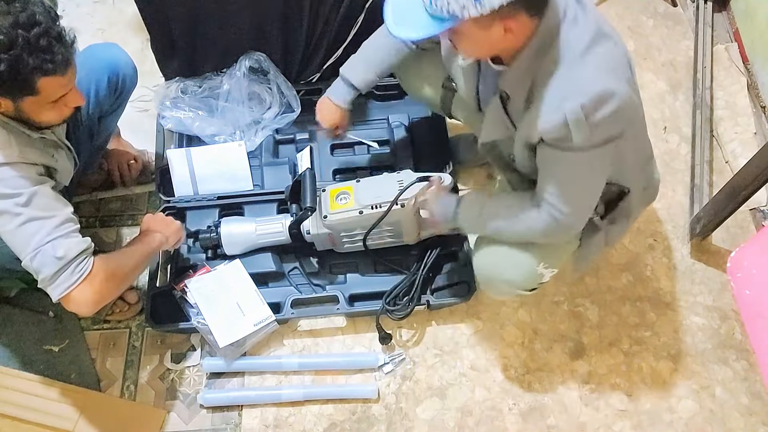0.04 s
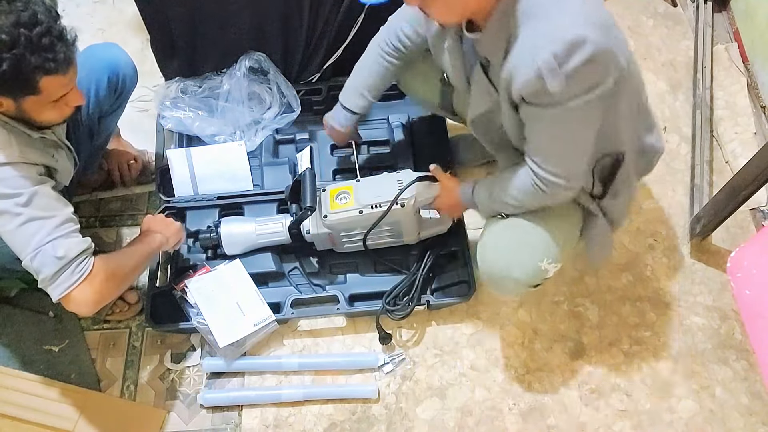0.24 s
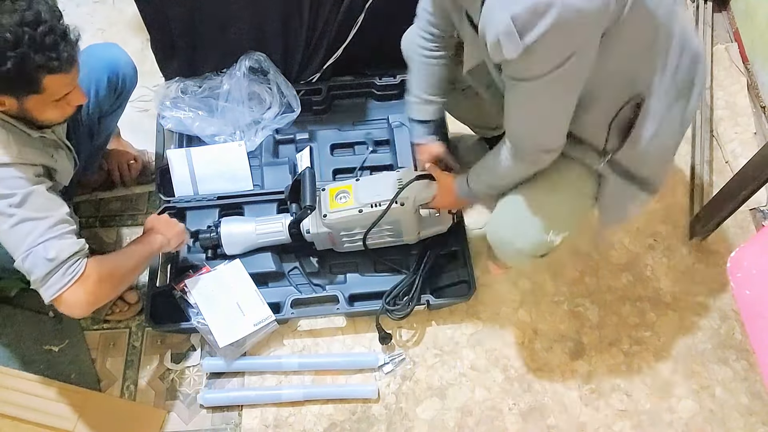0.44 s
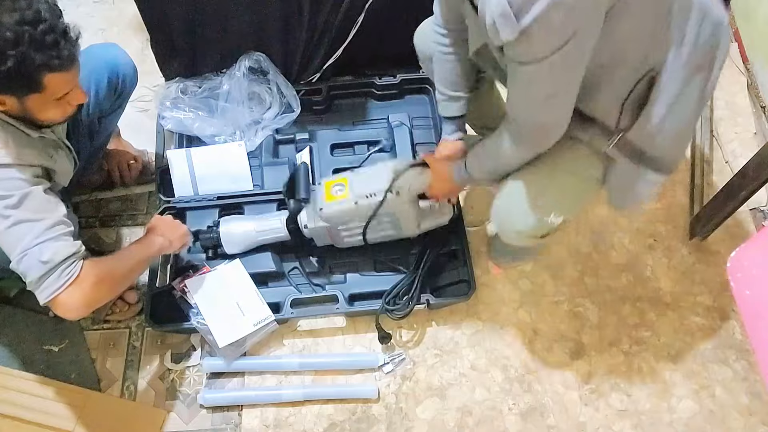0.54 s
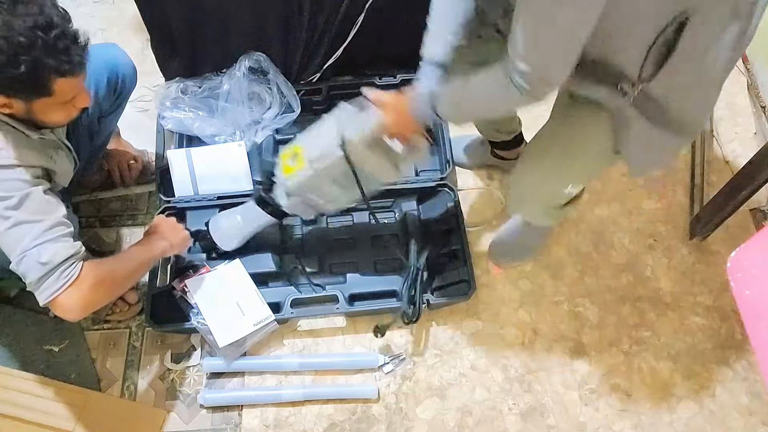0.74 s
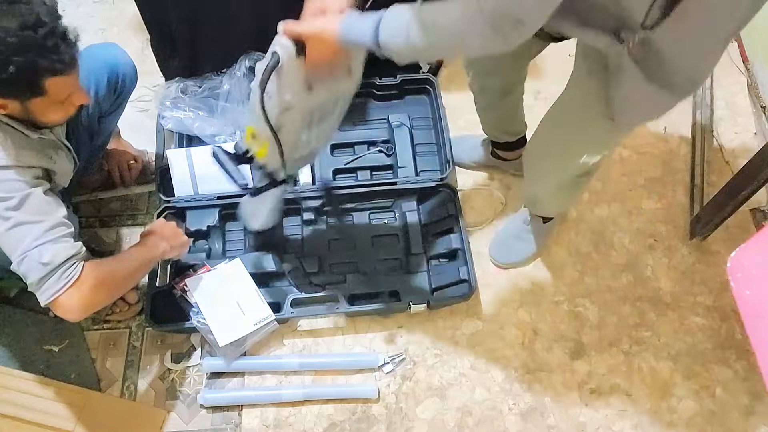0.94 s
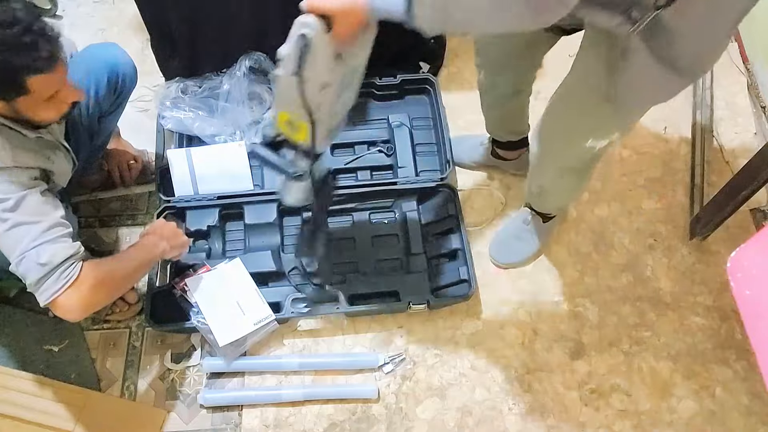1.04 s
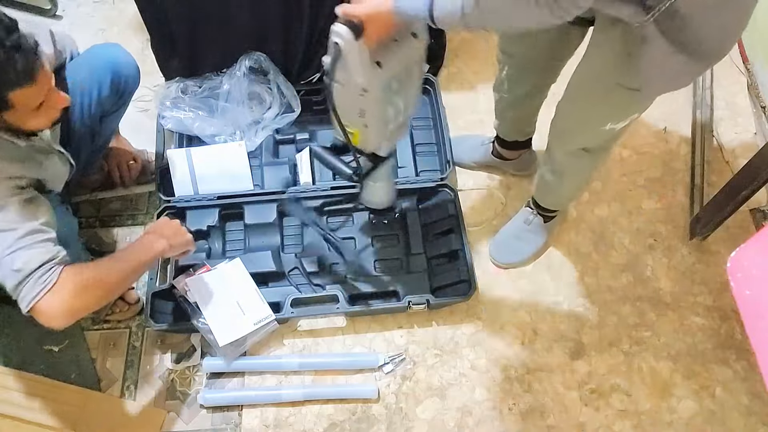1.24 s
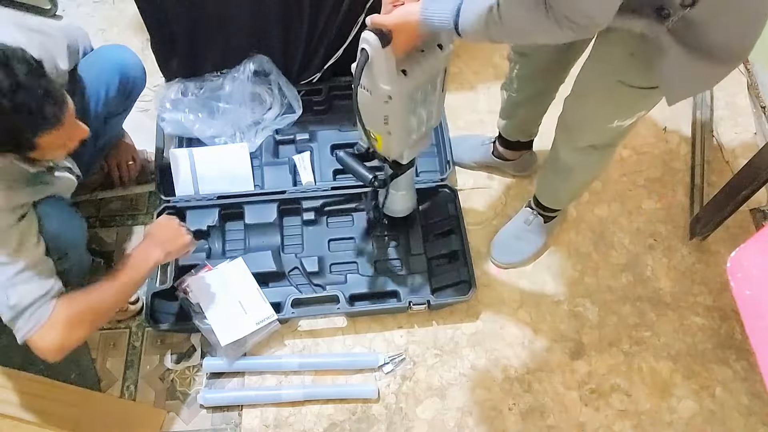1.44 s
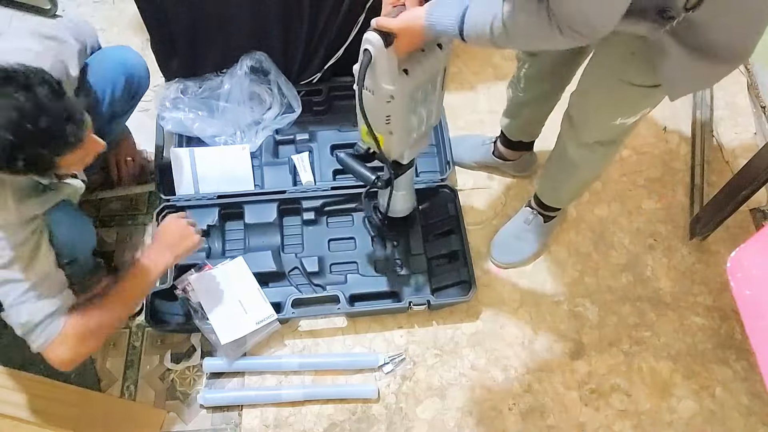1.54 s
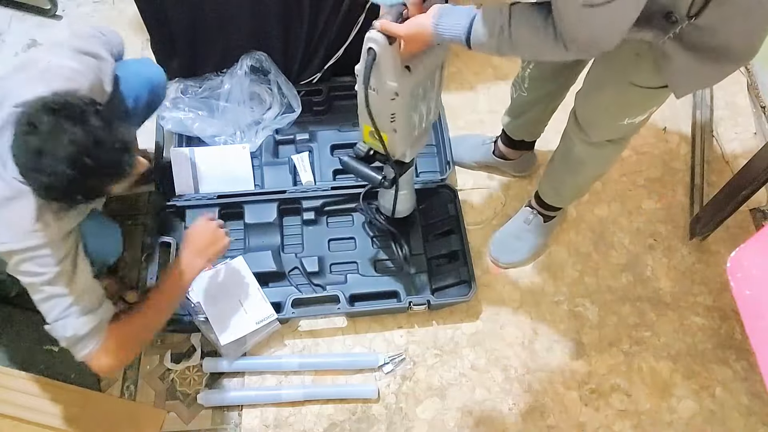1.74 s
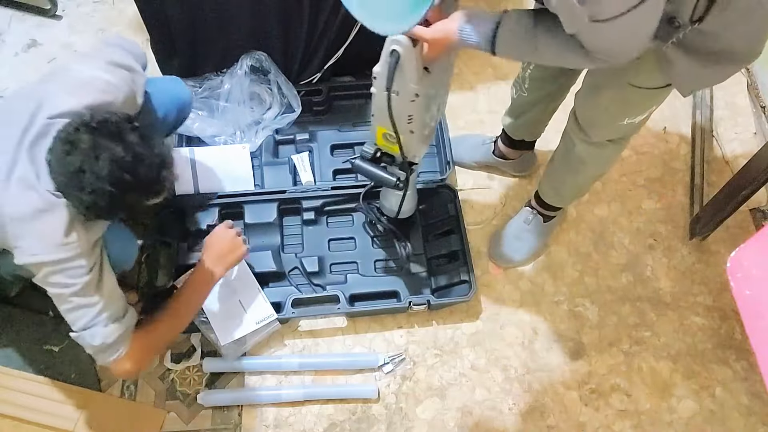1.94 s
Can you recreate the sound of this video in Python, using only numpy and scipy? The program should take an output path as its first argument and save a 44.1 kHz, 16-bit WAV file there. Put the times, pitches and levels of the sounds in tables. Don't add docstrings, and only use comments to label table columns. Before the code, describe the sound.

Hollow plastic thumps, cracks and steel clinks as a heavy power tool is stood upright indoors

```python
import sys
import numpy as np
from scipy import signal
from scipy.fft import rfft, irfft
from scipy.io import wavfile
from scipy.ndimage import uniform_filter1d

SR = 44100
rng = np.random.default_rng(int(sys.argv[2]) if len(sys.argv) > 2 else 0)


def invert_db(x):
    u = np.asarray(x, float) / 20
    return 10 ** u


def unload_audio(sound):
    columns = np.transpose(np.atleast_2d(sound))
    steps = np.round(np.clip(columns, -1, 1) * 32767)
    wavfile.write(sys.argv[1], SR, steps.astype(np.int16))


N = 88200
CHANGE_S, CHANGE_OUT_S = 1.925, 0.008


def evened(x):
    return x / np.sqrt(np.mean(x ** 2) + 1e-20)


def read(points, hz):
    f, value = np.transpose(points)
    return np.interp(np.log(hz + 1), np.log(f + 1), value)


def add(mix, start_s, sound):
    part = mix[round(start_s * SR):][:len(sound)]
    part += sound[:len(part)]


def colour(x, gain):
    size = x.shape[-1]
    return irfft(rfft(x) * gain(np.fft.rfftfreq(size, 1 / SR)), size)


def smooth_noise(x, size, **along):
    return uniform_filter1d(uniform_filter1d(x, size=size, **along), size=size, **along)


def resonances(f, hz, db, width_hz):
    peaks = 1 / (1 + ((f - hz[:, None]) / width_hz) ** 2) ** 2
    return np.sqrt((invert_db(2 * db)[:, None] * peaks).sum(axis=0))


def ring(t, hz, db, t60, rise_s, phase=0, curve=1):
    decay = invert_db(db - 60 * (t / t60) ** curve)
    onset = 1 - np.exp(-(t / rise_s) ** 2)
    return decay * onset * np.sin(2 * np.pi * hz * t + phase)


# frequency in Hz, likeness 0 to 1.
LIKENESS = [(60, .93), (300, 0.84), (600, 0.05), (2000, .15), (8000, 0.3)]


def pair(a, b):
    same = lambda hz: np.clip(read(LIKENESS, hz), -1, 1)
    other = lambda hz: np.sqrt(1 - same(hz) ** 2)
    return np.array([a, colour(a, same) + colour(b, other)])


# frequency in Hz, level in dB per Hz.
FLOOR_TONE = [(15, -32), (25, 3.5), (141, -9.5), (206, -24), (285, -18), (575, -47), (7310, -52),
              (16000, -70.5)]


def floor():
    level_db, after_db = -56, 4.0
    a, b = colour(rng.standard_normal((2, N)), lambda f: invert_db(read(FLOOR_TONE, f)) * (f > 18))
    changed = np.clip((np.arange(N) / SR - CHANGE_S) / CHANGE_OUT_S, 0, 1)
    return invert_db(level_db) * evened(pair(a, b)) * invert_db(after_db * changed)


# frequency in Hz, t60 in seconds.
ROOM_T60 = [(150, 0.29), (1000, 0.26), (4000, 0.1), (15000, 0.15)]


def room(x):
    taps = np.zeros((2, SR))
    at = np.arange(200, SR - 20, 20) + rng.integers(0, 20, (2, (SR - 201) // 20))
    np.put_along_axis(taps, at, rng.choice([-1., 1.], at.shape), 1)
    hz, t, z = signal.stft(taps, SR, nperseg=512)
    decay = invert_db(-60 * t / read(ROOM_T60, hz)[:, None])
    tail = signal.istft(z * decay, SR, nperseg=512)[1]
    tail = tail / np.linalg.norm(tail[0])
    return pair(*signal.fftconvolve(x[None], tail, axes=1)[:, :N])


def friction(effort, tone):
    slips_per_s, spread_db, level_db = 4500, 2.5, 1.5
    size = invert_db(spread_db * np.minimum(rng.exponential(1, N), 5))
    slips = size * (rng.random(N) < slips_per_s / SR) * rng.choice([-1., 1.], N)
    grain = rng.standard_normal(300) * np.exp(-np.arange(300) / 60)
    rough = signal.oaconvolve(slips, grain)[:N] + rng.standard_normal(N)
    x = colour(rough, lambda f: invert_db(read(tone, f)))
    x = x / np.std(colour(x, lambda f: (f > 700) & (f < 4000)))
    s, db = np.transpose(effort)
    return x * invert_db(level_db + np.interp(np.arange(N) / SR, s, db))


# time in seconds, level in dB.
RUSTLE_EFFORT = [(0, -76.5), (.04, -77.5), (.1, -77), (.2, -80), (.26, -73), (.37, -73), (.41, -78),
                 (.5, -72.5), (.58, -69.5), (.8, -77), (.9, -57.5), (1.12, -77), (1.3, -76), (1.36, -54),
                 (1.52, -58.5), (1.57, -83), (1.63, -92.5), (2, -95.5)]
# frequency in Hz, level in dB per Hz.
RUSTLE_SPECTRUM = [(700, -9.5), (2000, -8.5), (3300, -3), (5000, -4.5), (7500, -8), (9000, -17),
                   (16000, -20.5)]


def rustle():
    return friction(RUSTLE_EFFORT, RUSTLE_SPECTRUM)


# time in seconds, level in dB.
RUB_EFFORT = [(0, -78.5), (.2, -81.5), (0.259, -61.5), (.5, -53.5), (.58, -65.5), (.66, -64), (.9, -59.5),
              (1.101, -72.5), (1.17, -70), (1.3, -66.5), (1.402, -44), (1.55, -57), (1.63, -71.5),
              (1.75, -80)]
# frequency in Hz, level in dB per Hz.
RUB_SPECTRUM = [(110, 0), (400, -2), (800, -10), (2500, -23), (5000, -35), (7600, -41), (9000, -52)]


def rubbing():
    return friction(RUB_EFFORT, RUB_SPECTRUM)


# frequency in Hz, level in dB, t60 in seconds.
STEEL_MODES = [(4673, -23, .25), (5852, 0, .16), (6270, -11, .14), (7505, 4, .13), (9230, -9, .1),
               (12030, -17, .12), (10500, -17, .1), (12600, -16, .06), (13470, -19, .1), (14384, -8, .22),
               (14950, -9, .1), (15410, -13, .15)]
# start in seconds, peak in dB, lean to high modes in dB per octave,
# ring until damped in seconds.
STEEL_CLINKS = [(0.816, -52, -1.5, 0.077), (0.912, -22, -4, .035), (0.924, -30.5, 0, 0.11),
                (0.976, -44.5, 4.5, 0.083), (1.033, -44.5, 4.5, 0.031), (1.068, -47.5, 3, .03),
                (1.349, -40.5, 4.5, .05), (1.373, -31.5, -0.5, 0.027), (1.391, -39.5, -12.5, 0.052),
                (1.433, -54.5, -23.5, 0.07), (1.477, -36.5, -2.5, .06)]


def clinks():
    rise_s, damped_t60_s, scatter_db, chatter_db = 0.0094, 0.09, 1.5, 1.4
    fizz_db, fizz_t60_s, fizz_width_hz, fizz_bed_db = -8, 0.34, 80, -17.0
    out, t = np.zeros(N), np.arange(8192) / SR
    mode_hz, mode_db, _ = np.transpose(STEEL_MODES)
    count = len(STEEL_MODES)
    for start_s, db, lean, hold_s in STEEL_CLINKS:
        chatter = invert_db(chatter_db * evened(smooth_noise(rng.standard_normal((count, len(t))), 250)))
        modes = np.zeros(len(t))
        for (hz, level_db, t60), wobble in zip(STEEL_MODES, chatter):
            level_db = level_db + scatter_db * rng.standard_normal() + lean * 2 * np.log2(hz / 7500)
            modes += wobble * ring(t, hz, level_db, t60, rise_s, phase=6 * rng.standard_normal())
        blur_db = mode_db / 2 + scatter_db * rng.standard_normal(count) + lean * np.log2(mode_hz / 7500)
        blur = lambda f: resonances(f, mode_hz, blur_db, fizz_width_hz) + invert_db(fizz_bed_db) * (f > 4000)
        fizz = evened(colour(rng.standard_normal(len(t)), blur)) * chatter[0]
        fizz = fizz * invert_db(fizz_db - 60 * t / fizz_t60_s) * np.minimum(t / rise_s, 1)
        damping = invert_db(db - 60 * np.maximum(t - hold_s, 0) / damped_t60_s)
        add(out, start_s, damping * (modes + fizz))
    return out


# start in seconds, peak in dB, brightest pitch in Hz, t60 in seconds.
PLASTIC_CRACKS = [(.074, -53, 7230, 0.038), (0.231, -33.5, 1530, 0.039), (0.258, -37, 1560, 0.27),
                  (0.262, -43.5, 4110, 0.13), (.295, -33.5, 1950, 0.15), (0.352, -50.5, 3260, 0.21),
                  (0.427, -35.5, 1440, 0.015), (0.441, -37, 1480, 0.094), (0.546, -56, 9000, 0.057),
                  (.552, -60.5, 14000, 0.027), (.077, -62, 14000, 0.03), (.44, -45.5, 4900, .03),
                  (.465, -48.5, 2200, 0.28), (.51, -54.5, 3250, 0.14), (0.603, -33.5, 1370, 0.14),
                  (.614, -31, 1446, 0.12), (.628, -44.5, 7130, 0.089), (.737, -42.5, 2250, 0.052),
                  (0.72, -35, 2277, 0.046), (.720, -46.5, 3430, 0.031), (0.814, -53.5, 3370, 0.19),
                  (0.910, -25, 3215, 0.043), (0.909, -27, 1770, 0.025), (0.908, -42, 1117, 0.69),
                  (0.929, -35, 2246, 0.23), (1.032, -31.5, 3090, 0.11), (1.037, -28, 871, 0.071),
                  (1.344, -19, 1219, 0.067), (1.344, -28.5, 2240, 0.023), (1.366, -41, 3060, 0.13),
                  (1.485, -44, 1470, 0.114), (1.48, -56, 2050, .1), (1.49, -51, 5400, .12),
                  (1.433, -37.5, 861, 0.45), ]


def cracks():
    rise_s, scuff_s, scuff_db = 0.00037, 0.0049, -11
    cluster_db, snap_db, clean_db, clean_share = 3.5, -5, -3, 0.55
    pitch_spread, sharpness = 0.11, 0.06
    out, lead = np.zeros(N), 1300
    t = (np.arange(9600) - lead) / SR
    on = np.maximum(t, 0)
    brightest = np.arange(7) == 0
    for start_s, db, hz, t60 in PLASTIC_CRACKS:
        mode_hz = hz * np.exp(pitch_spread * rng.standard_normal(7) * ~brightest)
        mode_db = 3.0 * rng.standard_normal(7) + 3.0 * brightest
        noise, snap_noise = rng.standard_normal((2, len(t)))
        cluster = evened(colour(noise, lambda f: resonances(f, mode_hz, mode_db, sharpness * hz)))
        snap = evened(colour(snap_noise, lambda f: (f / hz) / (1 + (f / hz) ** 3.5)))
        strike = invert_db(-60 * on / t60) * np.minimum(on / rise_s, 1)
        scuff = invert_db(scuff_db) * np.exp(-abs(t) / scuff_s)
        rough = (strike + scuff) * (invert_db(cluster_db) * cluster / 2 + invert_db(snap_db) * snap)
        clean = ring(on, hz, clean_db, clean_share * t60, rise_s)
        add(out, start_s - lead / SR, invert_db(db) * (rough + clean))
    return out


# start in seconds, peak in dB, panel in Hz, t60 in seconds.
LOOSEN_THUMPS = [(0.228, -22.5, 318.8, 0.16), (.227, -26, 129, 0.063), (.229, -34, 570, 0.044),
                 (.250, -26.5, 373.2, 0.21), (0.263, -31, 106.4, 0.17), (.271, -23, 324, 0.089),
                 (.279, -13.5, 319, 0.059), (.262, -32, 462, 0.088), (0.309, -28.5, 139.5, 0.085),
                 (.35, -27.5, 130, 0.04), (0.28, -18, 197.5, 0.048), (.297, -25.5, 328, 0.076),
                 (0.339, -24.5, 285, 0.076), (0.382, -40, 300, 0.28), (.426, -24.5, 368.1, 0.093),
                 (.441, -22, 358.5, 0.11), (0.447, -21, 169.3, 0.029), (0.428, -31, 150, 0.054),
                 (0.503, -48.5, 363, 0.11), (0.522, -37, 110, 0.11), (0.532, -40, 112, 0.13),
                 (0.599, -25.5, 295, 0.045), (.613, -14.5, 329, 0.034), (0.613, -18.5, 222, 0.046),
                 (.615, -34, 101.3, 0.13), (0.649, -47.5, 199, 0.2), (0.719, -39, 204, 0.15),
                 (0.719, -24, 344, 0.058), (0.741, -25.5, 355, 0.06), (0.743, -29, 157, 0.053),
                 (0.814, -30.5, 475, 0.047), (0.838, -27, 473, 0.037), (0.861, -43, 207.5, 0.14)]
# start in seconds, peak in dB, panel in Hz, t60 in seconds.
STAND_THUMPS = [(0.911, -10, 167.7, 0.074), (0.909, -13.5, 477, 0.034), (.930, -22, 510, 0.058),
                (0.945, -20.5, 171.6, 0.06), (.953, -20, 463, 0.042), (0.999, -31.5, 150.6, 0.048),
                (1.034, -20.5, 409.6, 0.042), (1.042, -10, 168.8, 0.038), (1.054, -24.5, 236.3, 0.038),
                (1.084, -29.5, 355, 0.027), (1.09, -41, 146, 0.054), (1.194, -47, 225, 0.6),
                (1.341, -10, 304.5, 0.041), (1.343, -15.5, 443, 0.037), (1.35, -17.5, 180, 0.1),
                (1.366, -13.5, 229, 0.06), (1.378, -19.5, 232.5, 0.095), (1.397, -18.5, 235.5, 0.048),
                (1.425, -27.5, 389, 0.092), (1.372, -36.5, 44, .2), (1.405, -28, 376.6, 0.089),
                (1.448, -38, 373, 0.056), (1.428, -37.5, 197, 0.12), (1.506, -32, 370.6, 0.07),
                (1.545, -34.5, 231, .08), (1.476, -32, 367, 0.07), (1.492, -37.5, 259.3, 0.058),
                (1.521, -27, 360.3, 0.08), (1.542, -20, 356, 0.024), (1.562, -39, 386.5, 0.11),
                (1.50, -38, 104.3, 0.22)]


def thumps():
    panel_db, neighbour_db, skin_db, skin_hz = 2.6, -14.5, -13.5, 585
    out, t = np.zeros(N), np.arange(12288) / SR
    for start_s, db, hz, t60 in LOOSEN_THUMPS + STAND_THUMPS:
        rise_s = 1.2 / hz
        panel = ring(t, hz, panel_db, t60, rise_s, curve=1.3)
        neighbour = ring(t, hz * (1.3 + 0.29 * rng.random()), neighbour_db, 1.6 * t60, rise_s)
        dull = lambda f: (f / 200 / (1 + f / 200)) ** 2 / (1 + (f / skin_hz) ** 2)
        skin = evened(colour(rng.standard_normal(len(t)), dull))
        skin = skin * invert_db(skin_db - 60 * t / t60) * np.minimum(t / rise_s, 1)
        add(out, start_s, invert_db(db) * (panel + neighbour + skin))
    return out


# frequency in Hz, left minus right in dB.
BALANCE = [(250, 1), (500, 4), (2000, -1), (8000, -1.9)]


def scene():
    room_db = -8.5
    left, right = [rustle() + rubbing() + clinks() + cracks() for port in "LR"]
    near = thumps() + pair(left, right)
    half = lambda f: invert_db(read(BALANCE, f) / 2)
    direct = np.array([colour(near[0], half), colour(near[1], lambda f: 1 / half(f))])
    return direct + invert_db(room_db) * room(near[0]) + floor()


def patchy(x):
    depth_db, above_hz, threshold = -31, 6800, 0.56
    hz, t, z = signal.stft(x, SR, nperseg=512)
    field = smooth_noise(rng.standard_normal(z.shape[1:]), 4, axis=0)
    field = evened(smooth_noise(field, 14, axis=1))
    treble = 1 / (1 + (above_hz / (hz[:, None] + 1)) ** 8)
    shut = np.clip(2 * (field - threshold), 0, 1) * treble
    return signal.istft(z * invert_db(depth_db * shut), SR, nperseg=512)[1][:, :N]


def band_limit(x):
    return signal.sosfilt(signal.butter(12, 16480, fs=SR, output="sos"), x)


# frequency in Hz, gain in dB.
MICROPHONE_RESPONSE = [(7800, 0), (8200, -9.5), (8900, -12.5), (9200, -1.5), (10000, -6.5), (11000, -1),
                       (15600, -1), (15900, -18)]


def record(dry):
    dip_db, dip_in_s, low_cut_hz, edge_hz = -7.0, 0.02, 30, 16000
    t = np.arange(N) / SR - CHANGE_S
    dip = np.exp(-(t / np.where(t < 0, dip_in_s, CHANGE_OUT_S)) ** 2)
    low_cut = lambda f: (f / low_cut_hz) ** 2 / (1 + (f / low_cut_hz) ** 2)
    response = lambda f: (f < edge_hz) * invert_db(read(MICROPHONE_RESPONSE, f)) * low_cut(f)
    mix = patchy(colour(dry * invert_db(dip_db * dip), response))
    return band_limit(mix)


dry = scene()
out = record(dry)
unload_audio(out)
```